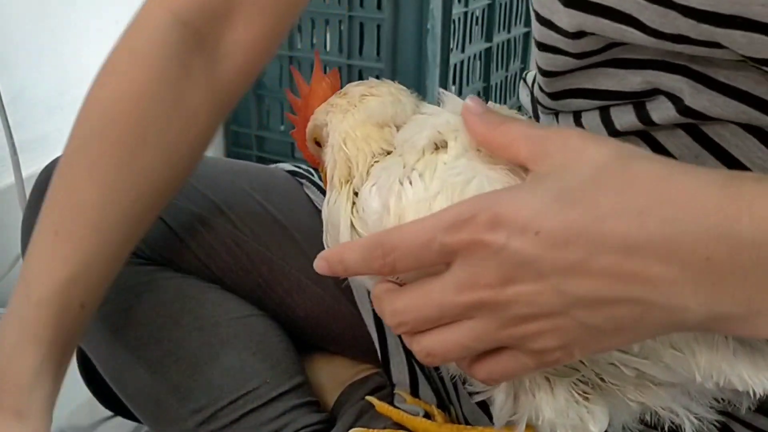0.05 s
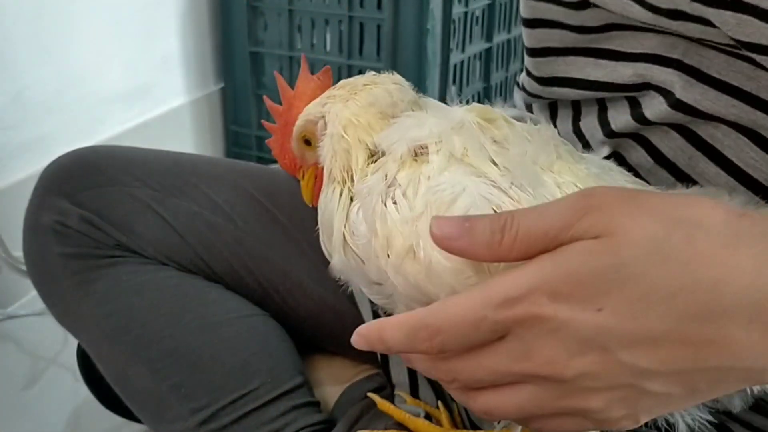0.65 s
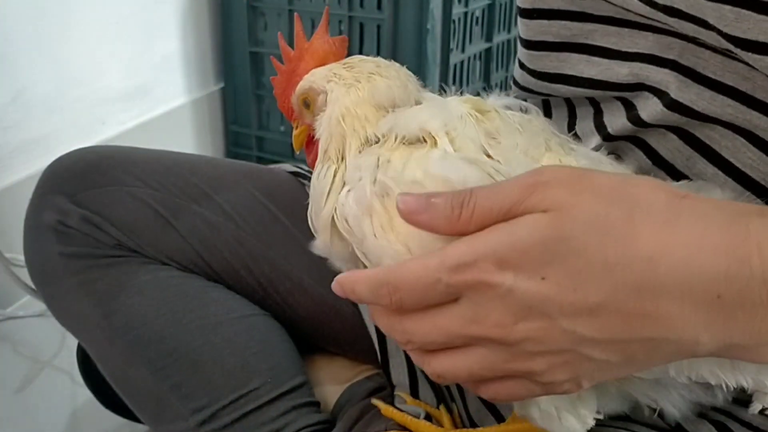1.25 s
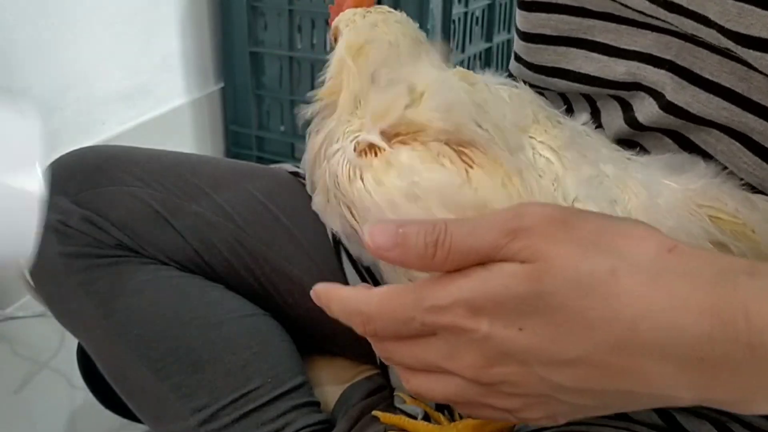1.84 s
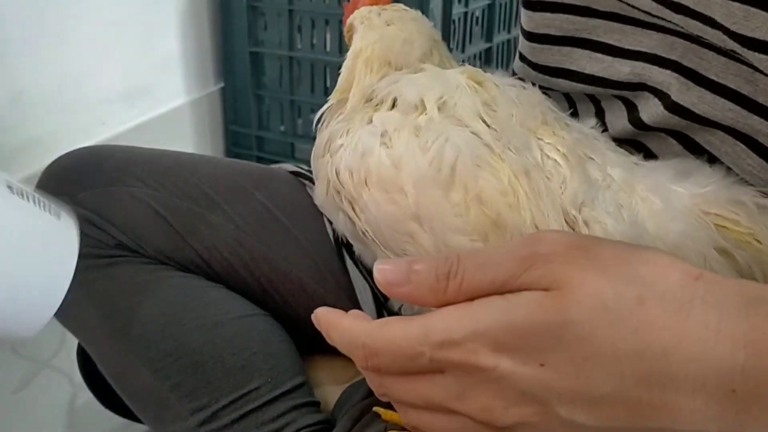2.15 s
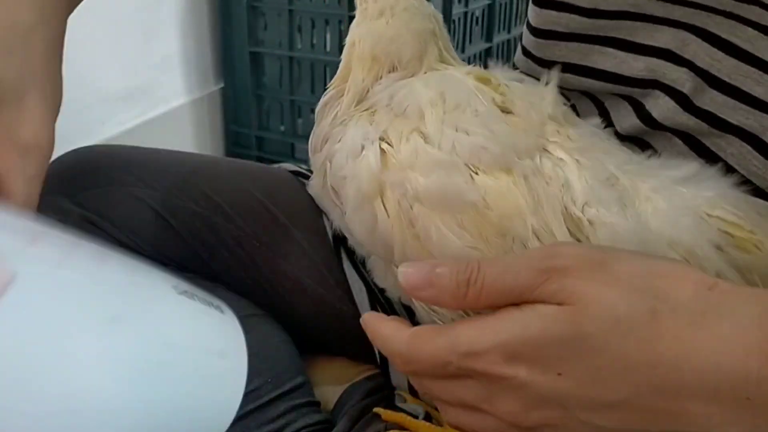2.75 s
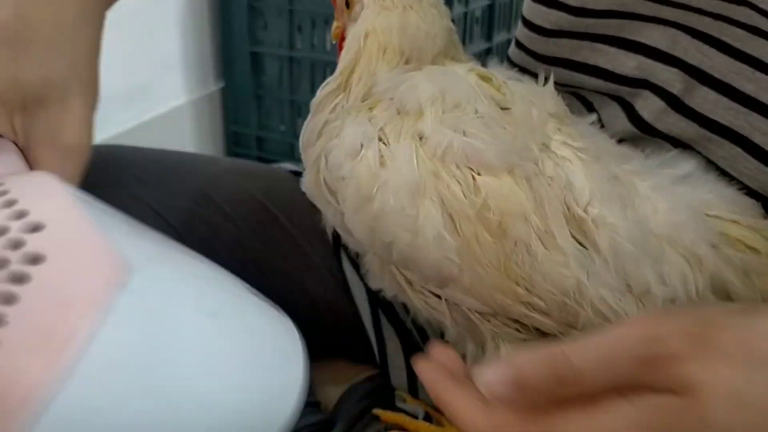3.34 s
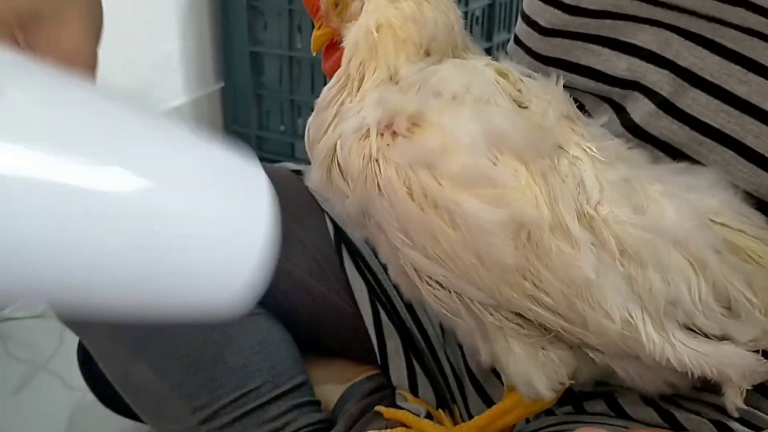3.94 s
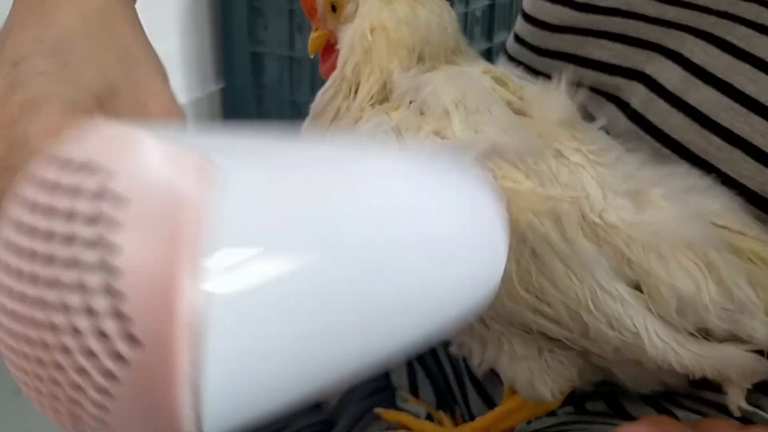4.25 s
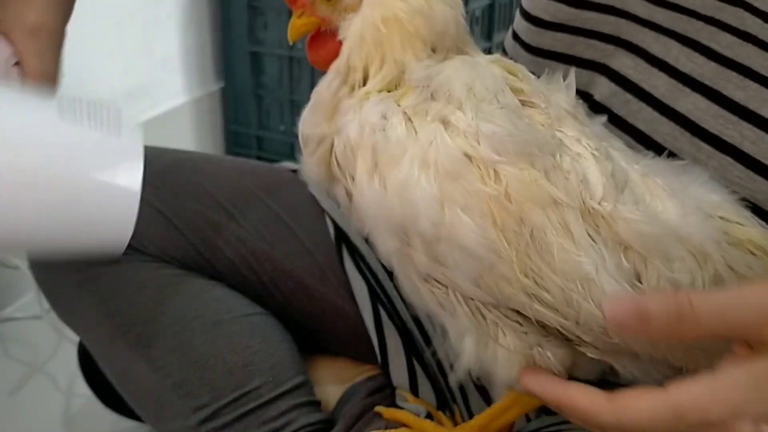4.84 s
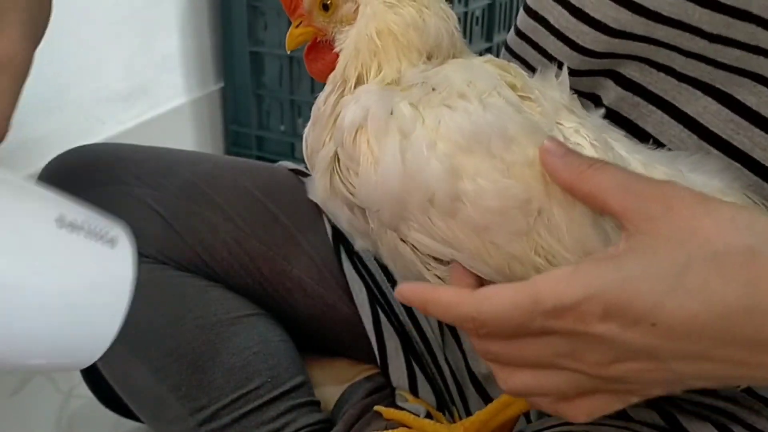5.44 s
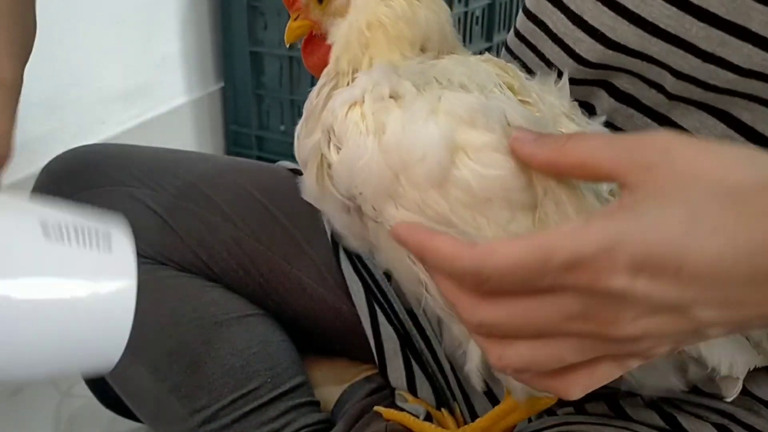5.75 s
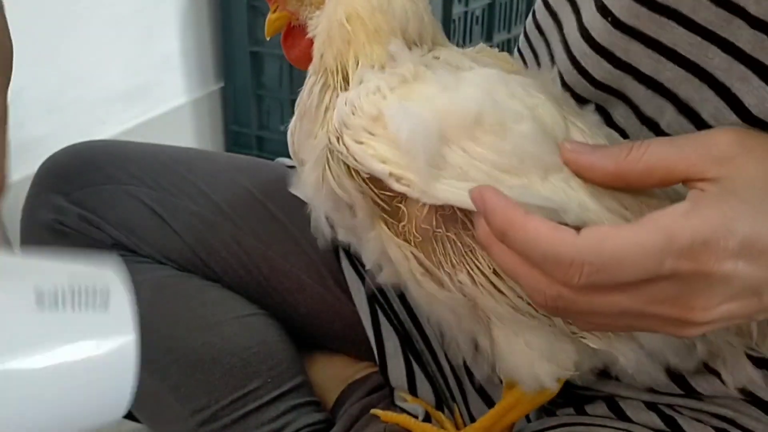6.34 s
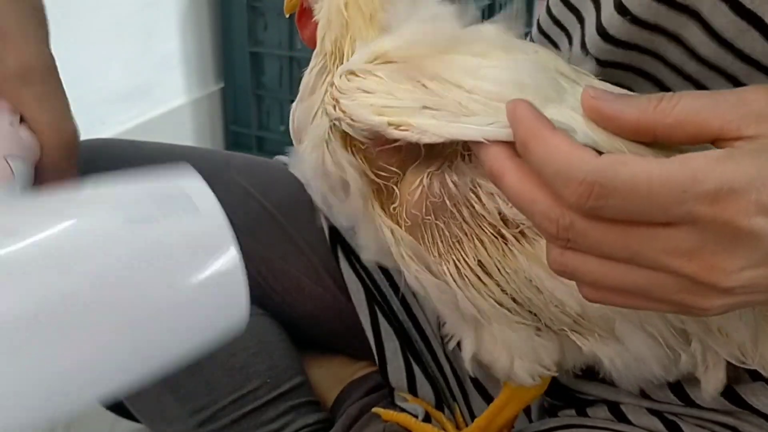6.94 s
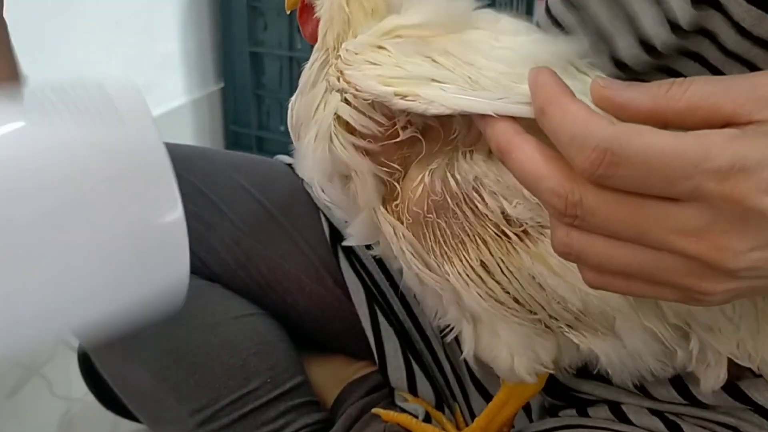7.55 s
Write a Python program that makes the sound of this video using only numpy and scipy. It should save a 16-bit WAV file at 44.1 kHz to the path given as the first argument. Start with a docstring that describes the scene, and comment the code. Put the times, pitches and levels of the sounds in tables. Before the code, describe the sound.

A close hair dryer is switched on with a sharp double click and a brief ring of its plastic shell. Its fan rises to full speed, then keeps blowing on a hen's feathers with a hollow roar, a hiss and a thin whine. Quick swings of the wrist make the sound pulse and sweep, and it gets louder for a while as the dryer comes nearer. The small tiled room adds a short echo.

```python
"""In a small tiled room, a hand-held hair dryer is clicked on and waved over a hen's damp feathers.
The plastic shell rings as the motor starts, and the five-blade fan whines up to speed.
Air roars in the barrel, splashes on the bird and hisses at the grille. The wrist swings the dryer
four or five times a second, and with the swings the roar and the whine swell and fade."""
import sys
import numpy as np
from scipy import signal
from scipy.fft import rfft, irfft
from scipy.io import wavfile

SR = 44100
rng = np.random.default_rng(int(sys.argv[2]) if len(sys.argv) > 2 else 0)


def unload_wav(signal):
    """Save mono or channel-first audio to the path in sys.argv[1] as 16-bit WAV at rate SR, clipped to [-1, 1]."""
    wavfile.write(
        sys.argv[1],
        SR,
        np.round(np.clip(np.atleast_2d(signal).T, -1, 1) * 32767).astype(np.int16),
    )


N = 335160
TIME = np.arange(N) / SR
HZ = np.fft.rfftfreq(N, 1 / SR)


def amp(db):
    """Turns decibels into a number to multiply by."""
    return 10 ** (np.asarray(db) / 20)


def unit(x):
    """Scales a sound to an average strength (rms) of 1."""
    return x / np.sqrt(np.mean(x ** 2) + 1e-20)


def read(points, hz):
    """Looks up values by pitch, joining the points along a scale of octaves."""
    pitches, values = np.transpose(points)
    return np.interp(np.log(hz + 1), np.log(pitches + 1), values)


def curve(points):
    """Joins points in time with straight lines."""
    return np.interp(TIME, *np.transpose(points))


def swell(peak_s, half_s):
    """A smooth rise to 1 and back."""
    return np.exp(-((TIME - peak_s) / half_s) ** 2)


def add(mix, start_s, sound):
    """Mixes a sound in at a given time."""
    part = mix[round(start_s * SR):][:len(sound)]
    part += sound[:len(part)]


def noise(gain):
    """Noise of strength 1, shaped by a gain for each pitch."""
    return unit(irfft(rfft(rng.standard_normal(N)) * gain, N))


def drift(rate_hz, step=32):
    """A slow random wander of strength 1."""
    t = TIME[::step]
    hz = np.fft.rfftfreq(len(t), step / SR)
    slow = irfft(rfft(rng.standard_normal(len(t))) / (1 + (hz / rate_hz) ** 4), len(t))
    return np.interp(TIME, t, unit(slow))


def tone(cycles, blur, blur_hz):
    """A tone of strength 1, blurred as by uneven airflow or rattling."""
    angle = 2 * np.pi * (cycles % 1)
    return unit((1 + blur * drift(blur_hz)) * np.cos(angle) + blur * drift(blur_hz) * np.sin(angle))


def still_room():
    """Low room noise with a faint wavering hum."""
    colour = [(20, -8), (38, -26), (55, -5), (90, -11.5), (125, -13.5), (280, -21), (400, -24),
              (850, -21.5), (1000, -25.5), (1700, -27.5), (3000, -35), (5600, -47), (8100, -41),
              (9300, -47), (15500, -47)]  # the quiet room's noise: pitch_hz, level_db
    hum_notes = [(51, -74), (75.5, -80), (101, -83), (200.5, -87), (285.5, -87)]  # its hum: pitch_hz, level_db
    hum = sum(amp(db) * tone(hz * TIME, blur=0.39, blur_hz=2) for hz, db in hum_notes)
    return amp(-70.5) * noise(amp(read(colour, HZ))) + hum


def switch():
    """Fingers tick on the handle, then the switch snaps over two notches, bouncing at each."""
    # ticks and snaps: start_s, level_db, ring_s, brightness_db_per_octave
    clicks = [(.143, -75, .03, 0), (.158, -70, .025, 5), (.425, -70, .02, -5), (.5305, -61, 0.013, 2.5),
              (0.68, -62, .012, -2), (.6828, -36.5, 0.026, 4.5), (0.687, -50, 0.017, -9),
              (0.732, -35, 0.017, 3.5), (0.7346, -39, 0.029, -2), (.807, -48, .04, -11)]
    plastic = [(200, -32), (700, -17), (1100, 12), (1450, -5), (1850, 3), (2200, 1), (2700, 4.5),
               (4000, -1), (5800, 5), (6800, -7), (8300, 7.5), (9500, -5.5), (12500, -5), (15400, -7)]  # the sound of tapped plastic: pitch_hz, level_db
    out, t = np.zeros(N), np.arange(4096) / SR
    hz = np.fft.rfftfreq(len(t), 1 / SR)
    for start_s, level_db, ring_s, brightness in clicks:
        colour = amp(read(plastic, hz) + brightness * np.log2((hz + 100) / 4000))
        crack = unit(irfft(rfft(rng.standard_normal(len(t))) * colour))
        add(out, start_s, crack * amp(level_db - 60 * t / ring_s))
    return out


def echoes(x):
    """The room's many echoes blur into a tail; low notes last longest."""
    fade_times = [(200, 0.39), (1000, 0.3), (4000, 0.18), (8000, 0.18), (15000, 0.31)]  # time for echoes to fall 60 dB: pitch_hz, fade_s
    size = SR // 2
    bounces = rng.standard_normal(size) * (rng.random(size) < .1)
    bounces[:180] = 0  # a short gap before the first echo
    hz, t, bands = signal.stft(bounces, SR, nperseg=256)
    fade = np.exp(-np.log(1000) * t / read(fade_times, hz)[:, None])
    tail = signal.istft(bands * fade, SR, nperseg=256)[1]
    return signal.oaconvolve(x, tail / np.linalg.norm(tail))[:N]


def shell():
    """The motor's starting jolt rings the plastic shell, and the rattling rotor roughens the ring."""
    rings = [(.684, 1040, -59, 0.0033, 0.2), (.73, 790, -38.5, 0.042, 0.21),
             (0.791, 1050, -42.5, 0.018, 0.24), (.805, 1186, -48, .003, 0.094)]  # the shell's notes: start_s, pitch_hz, level_db, rise_s, ring_s
    out, t = np.zeros(N), np.arange(SR // 2) / SR
    for start_s, pitch_hz, level_db, rise_s, ring_s in rings:
        ring = tone(pitch_hz * TIME, blur=0.26, blur_hz=70)[:len(t)]
        rise = (1 - np.exp(-t / rise_s)) ** 2
        add(out, start_s, amp(level_db - 60 * t / ring_s) * rise * ring)
    return out


def resonance(pitch_hz, width_hz):
    """How strongly a tube of air rings around one of its own notes."""
    return 1 / (1 + (2 * (HZ - pitch_hz) / width_hz) ** 2)


def barrel_roar(speed, lift_db):
    """Swirling air rings the barrel: a roar with a hollow note above it."""
    notes = [(1076, 93, 3.5), (1161, 190, 5), (960, 87, -11)]  # the air in the barrel: pitch_hz, width_hz, level_db
    roar_levels = [(1.25, -42), (2.3, -44), (2.8, -48), (3.4, -45), (4.1, -43.5), (4.9, -46.5),
                   (5.4, -41.5), (6.3, -43.5), (7.0, -46), (7.6, -49)]  # the roar between swings: time_s, level_db
    hollow_levels = [(1.3, -60), (1.5, -46), (1.85, -52.0), (2.12, -47.0), (2.7, -49.5), (3.4, -46),
                     (3.9, -56), (4.5, -58), (5.2, -44.5), (5.6, -47.5), (6.2, -52), (7.6, -64)]  # the hollow note: time_s, level_db
    colour = np.sqrt(sum((amp(db) * resonance(hz, width)) ** 2 for hz, width, db in notes))
    roar = amp(curve(roar_levels) - .5 + lift_db) * speed ** 3.1 * noise(colour)
    hollow = noise(resonance(pitch_hz=1767, width_hz=130))
    return roar + amp(curve(hollow_levels) - 3 + 0.4 * lift_db) * speed ** 6 * hollow


def rush(colour, speed, gain_db, power, near_share):
    """Rushing air, louder as the fan speeds up and, by near_share, as the dryer comes closer."""
    nearness = [(1.25, -5), (1.8, -4), (2.4, -1), (2.8, 3), (3.4, 6.5), (3.85, 0), (4.12, 3), (4.3, 6.5),
                (4.58, 7), (4.9, -1), (6.0, 1), (6.35, 0.5), (6.9, 0.5), (7.6, 3)]  # the dryer brought in and drawn back: time_s, boost_db
    return amp(gain_db + near_share * curve(nearness)) * speed ** power * noise(amp(read(colour, HZ)))


def feather_splash(speed, lift_db):
    """The jet of air hits the feathers; a swing turns it a little away."""
    colour = [(200, -24), (380, -6), (540, -8), (720, -7.5), (900, 2), (1300, -1), (1700, 0.5), (2100, 0.5),
              (2580, 4), (3330, -2), (3600, -1), (4150, -4.5), (4800, -5), (6500, -17)]  # air on feathers: pitch_hz, level_db
    return amp(-0.096 * lift_db) * rush(colour, speed, gain_db=-40.5, power=3, near_share=0.17)


def grille_hiss(speed):
    """Air hisses through the grille."""
    colour = [(300, -5), (1500, -26), (3600, 3), (5200, -2), (6050, -0.5), (6600, 3), (7400, 8.5),
              (7900, 8), (8350, 12), (9200, -0.5), (11500, -2), (13500, 1), (15300, 7), (16000, -1.5)]  # the hiss: pitch_hz, level_db
    levels = [(1.3, -47), (1.35, -47.5), (2.54, -46.5), (2.88, -47), (5.68, -46.5), (7.6, -46.5)]  # its loudness: time_s, level_db
    return amp(curve(levels)) * rush(colour, speed, gain_db=5, power=3.8, near_share=0.093)


def intake_rush(speed, lift_db):
    """Air is sucked into the dryer, much louder when the intake is near."""
    colour = [(300, -50), (620, -14.5), (780, -5.5), (1000, -0.5), (1400, 3), (1850, -7), (2120, -2),
              (2400, -10), (2720, -11.5), (3100, -7), (3600, -7), (4200, -17), (6100, -10), (12000, -24)]  # air rushing in: pitch_hz, level_db
    return amp(0.46 * lift_db) * rush(colour, speed, gain_db=-50, power=2.6, near_share=1.78)


def lip_sizzle(speed, lift_db):
    """Air sizzles over the nozzle's lip; a swing turns the lip away."""
    colour = [(3500, -21), (5100, -22), (5650, -2), (6250, -3), (6800, -10), (9000, -27)]  # the sizzle: pitch_hz, level_db
    levels = [(1.3, -49), (2.3, -53), (2.45, -50), (3.0, -51), (3.3, -52), (3.6, -51), (4.0, -55.5),
              (4.4, -64), (4.75, -47), (5.35, -52), (5.6, -46.5), (6.1, -53.5), (7.15, -49), (7.4, -63),
              (7.6, -48)]  # its loudness: time_s, level_db
    return amp(curve(levels) - 0.41 * lift_db) * rush(colour, speed, gain_db=-3, power=4.5, near_share=0)


def draught_rumble(speed):
    """The draught makes a low rumble."""
    colour = [(20, -4), (42, -14), (54, -1.5), (64, -10.5), (100, -9.5), (145, -7.5), (200, -13),
              (400, -12.5), (1000, -50)]  # the rumble: pitch_hz, level_db
    return rush(colour, speed, gain_db=-67.5, power=5.7, near_share=0.11)


def low_note(speed, pitch_hz=164.5):
    """A dull low note that swells twice."""
    swells = [(4.76, -66), (6.11, -59)]  # its loud moments: peak_s, level_db
    level = amp(-77.5) * speed ** 8 + sum(amp(db) * swell(s, half_s=0.093) for s, db in swells)
    return level * tone(pitch_hz * TIME, blur=0.62, blur_hz=4.8)


def airflow(speed, lift_db):
    """All the sounds of moving air; lift_db is the boost that the swings give the roar."""
    air = barrel_roar(speed, lift_db) + feather_splash(speed, lift_db) + grille_hiss(speed)
    air += intake_rush(speed, lift_db) + lip_sizzle(speed, lift_db)
    air += draught_rumble(speed) + low_note(speed)
    return air * np.clip(speed / 0.19, 0, 1) ** 2  # no wind until the fan turns


def moving_echoes(x, tail_db=-8.5, turn_hz=0.5955, sway=0.1504):
    """As the dryer is waved, shifting echoes give the rush a hollow, sweeping sound."""
    nearby = [(.0011, -15), (.0023, -23.5), (.0042, -23)]  # echoes off the hen, knee and wall: delay_s, level_db
    near = np.zeros(N)
    for delay_s, level_db in nearby:
        moving_delay_s = delay_s * (1 + sway * drift(0.83))
        near += amp(level_db) * np.interp(TIME - moving_delay_s, TIME, x)
    angle = 2 * np.pi * turn_hz * TIME
    tail = np.cos(angle) * echoes(x) + np.sin(angle) * echoes(x)  # glides between two random tails
    return (x + near + amp(tail_db) * tail) / np.hypot(1, amp(tail_db))


def fan_whine(speed, tone_lift_db, octave_lift_db, blades=5, waver=.0007):
    """The passing blades make a whine, and the off-balance rotor adds weaker tones."""
    pitches = [(1.1, 1501), (1.4, 1510), (1.8, 1502), (4.2, 1502), (4.55, 1498), (5.4, 1503), (6.6, 1497),
               (7.6, 1496)]  # full-speed blade tone as the load changes: time_s, pitch_hz
    run_up = [(.84, -85, -95), (.87, -56, -80), (.95, -45.5, -54), (1.03, -51, -62), (1.11, -43.5, -50),
              (1.25, -46, -53), (1.38, -53, -56), (1.55, -85, -80)]  # the whine while speeding up: time_s, tone_db, octave_db
    tone_levels = [(1.3, -60.0), (1.8, -58.5), (2.4, -68.0), (2.8, -54), (3.3, -49.5), (3.85, -51.5),
                   (4.2, -53.5), (4.45, -46.5), (4.7, -59.5), (5.05, -54.0), (5.3, -50.5), (6.25, -58),
                   (7.1, -56.5), (7.6, -53)]  # the blade tone between swings: time_s, level_db
    octave_levels = [(1.3, -65), (2.15, -52), (2.42, -58), (2.68, -49), (3.1, -53), (3.4, -66), (3.67, -49),
                     (3.9, -61), (4.15, -54), (4.45, -63), (4.75, -57), (5.15, -57), (6.25, -67),
                     (6.65, -56), (7.35, -50), (7.6, -53)]  # its octave between swings: time_s, level_db
    triple_levels = [(1.3, -70), (2.5, -70), (2.75, -69), (3.3, -64), (3.65, -74), (3.8, -58),
                     (3.92, -69.5), (4.03, -53.5), (4.2, -76.5), (4.43, -63), (5.0, -62), (5.5, -69),
                     (6.5, -73), (6.65, -56), (6.8, -68), (7.35, -64), (7.55, -60)]  # the tone at three times its pitch: time_s, level_db
    overtones = [(4, -59.5), (5, -71), (6, -70), (7, -67)]  # faint higher tones: times_blade_pitch, level_db
    rotor_tones = [(1, -67.5, 0.25), (2, -66.5, 3.4), (3, -88, 2.4), (4, -49.5, 0.42), (6, -60, 0.47)]  # the rotor's shaking: times_spin_rate, level_db, blur
    passes = np.cumsum(curve(pitches) * speed * (1 + waver * drift(10))) / SR  # blades gone by so far
    time_s, *run_up_db = np.transpose(run_up)
    tone_gain, octave_gain = (amp(np.interp(TIME, time_s, db)) * np.sqrt(speed) for db in run_up_db)
    running = speed ** 8  # fades in near full speed
    tone_gain += amp(3 + curve(tone_levels) + tone_lift_db) * running
    octave_gain += amp(3 + curve(octave_levels) + octave_lift_db) * running
    whine = tone_gain * tone(passes, blur=0.28, blur_hz=22)
    whine += octave_gain * tone(2 * passes, blur=.15, blur_hz=25)
    upper = amp(6 + curve(triple_levels)) * tone(3 * passes, blur=0.45, blur_hz=25)
    upper += sum(amp(db) * tone(k * passes, blur=2.7, blur_hz=29.5) for k, db in overtones)
    rotor = sum(amp(db) * tone(k * passes / blades, blur, blur_hz=14.5) for k, db, blur in rotor_tones)
    return whine + upper * running + rotor * speed ** 7


def wrist_swings():
    """Each swing sweeps the nozzle past; gives the lift in dB of the roar, blade tone and octave."""
    swings = [(1.45, 5, 14.5, 11), (1.68, 7, 11, 5), (1.9, 4.5, 0, 6), (2.11, 9, 9, 4),
              (2.32, 7.5, 14, 2.5), (2.53, 7.5, 10, 3), (2.72, 8.5, 5, 8.5), (2.96, 5, -1, 7),
              (3.17, 4, 0, 10.5), (3.42, 0, 0, 0), (3.7, 5, 1.5, 8), (3.95, 3.5, 4, 3), (4.11, 4.5, 2, 8),
              (4.34, 2.5, 10.5, 0), (4.52, 0.5, 8.5, -4), (4.79, 9, 16, 10.5), (4.94, 8.5, 5, -1),
              (5.18, 3.5, 7, 1), (5.39, 5.5, 4, 11), (5.62, 4.5, 6.5, 12.5), (5.88, 2, 9.5, 11.5),
              (6.11, 3, 13, 16), (6.36, 4, 11.5, 15), (6.6, 5, 10, 11), (6.83, 5.5, 10, 5.5),
              (7.03, 8, 6.5, 5), (7.21, 8, 10, 1.5), (7.42, 6.5, 10, 4)]  # the nozzle's sweeps: peak_s, roar_lift_db, tone_lift_db, octave_lift_db
    half_lengths = (0.067, .075, 0.082)  # half the length of a swell: roar_s, tone_s, octave_s
    half_s = np.array(half_lengths)[:, None]
    return sum(np.array(lifts_db)[:, None] * swell(peak_s, half_s) for peak_s, *lifts_db in swings)


def scene(start_s=.676, spin_up_s=.322, click_echo_db=-6):
    """The dryer close by, the same in both ears."""
    # the motor's steady push works against growing air drag, so speed climbs from 0 and settles at 1
    speed = np.tanh(np.maximum(TIME - start_s, 0) / spin_up_s)
    roar_lift_db, tone_lift_db, octave_lift_db = wrist_swings()
    clicks = switch()
    mono = moving_echoes(airflow(speed, roar_lift_db)) + fan_whine(speed, tone_lift_db, octave_lift_db)
    mono += clicks + amp(click_echo_db) * echoes(clicks) + shell() + still_room()
    return np.array([mono, mono])


def record(dry, cutoff_hz=15560):
    """Cuts away the very highest treble."""
    lowpass = signal.firwin(801, cutoff_hz, window=("kaiser", 8), fs=SR)
    return signal.oaconvolve(dry, lowpass[None], "same", axes=1)


dry = scene()
out = record(dry)
unload_wav(out)
```